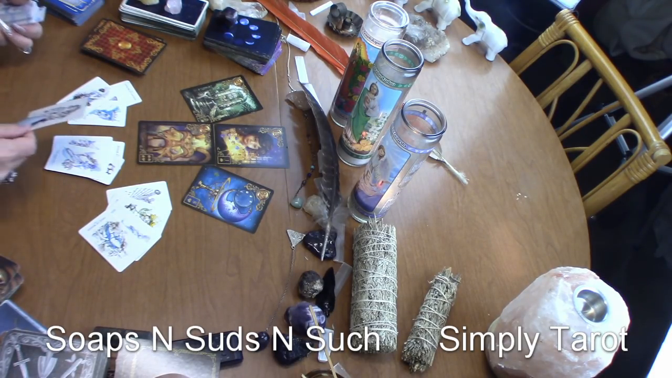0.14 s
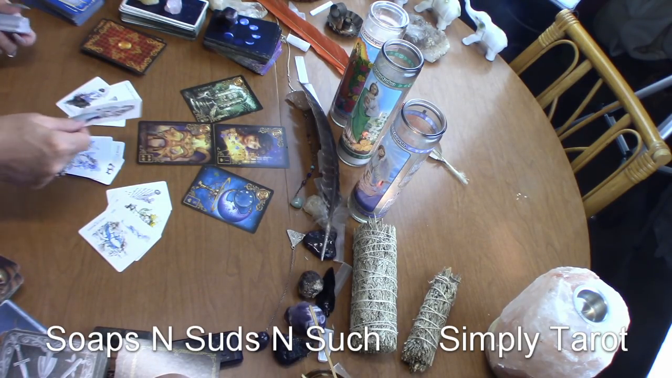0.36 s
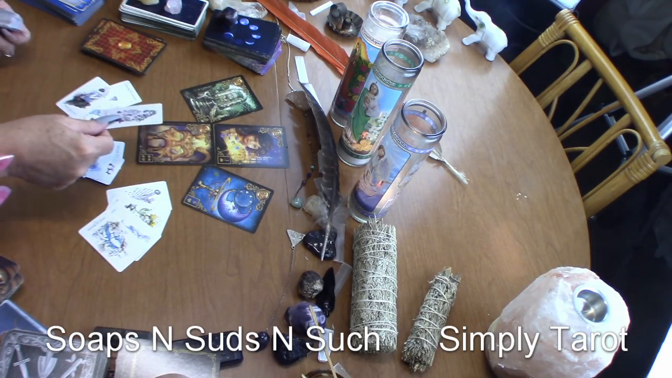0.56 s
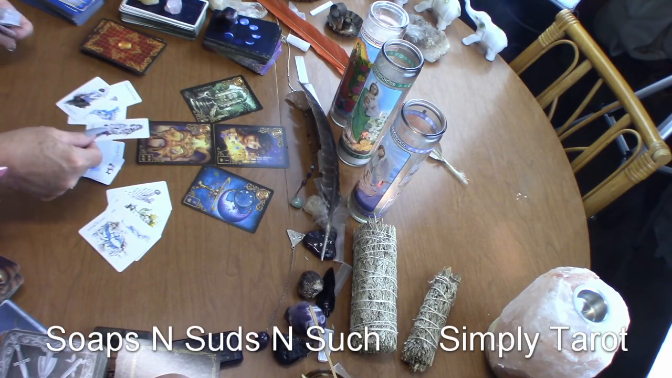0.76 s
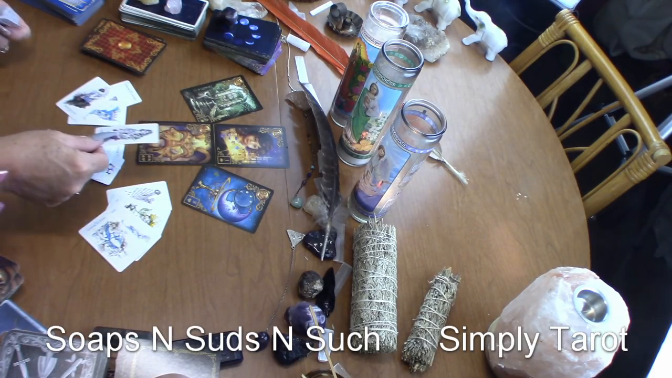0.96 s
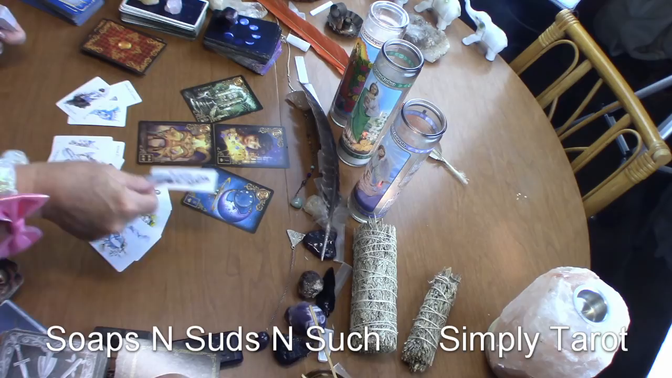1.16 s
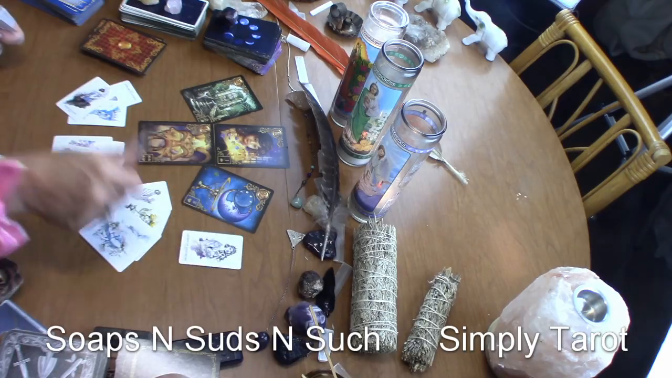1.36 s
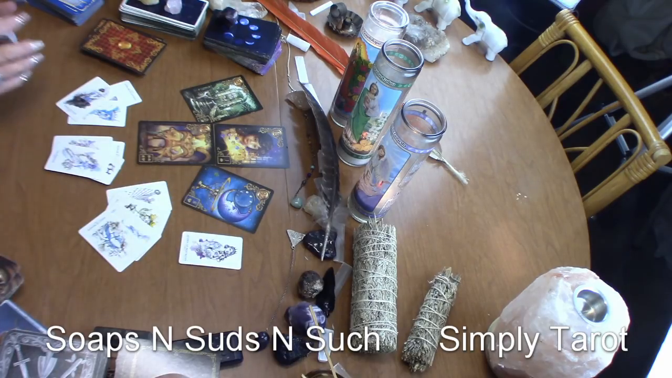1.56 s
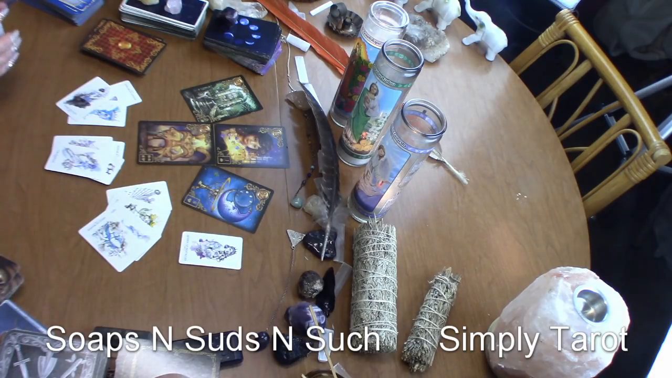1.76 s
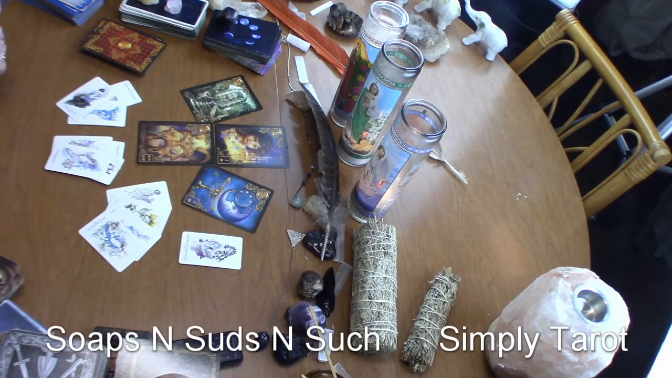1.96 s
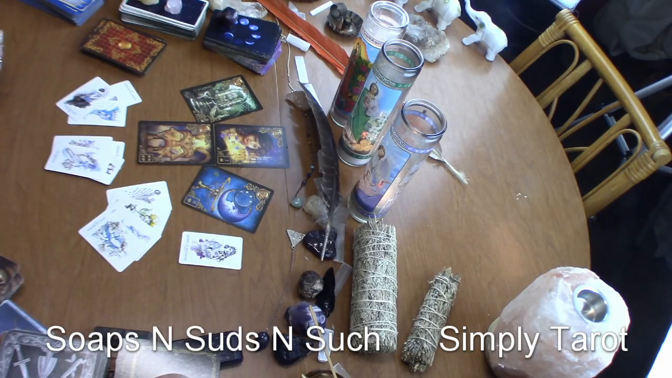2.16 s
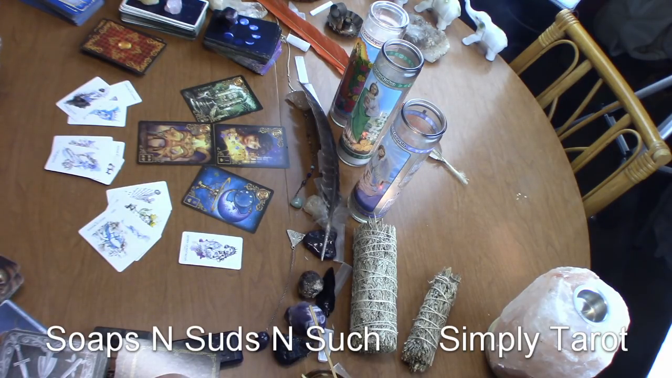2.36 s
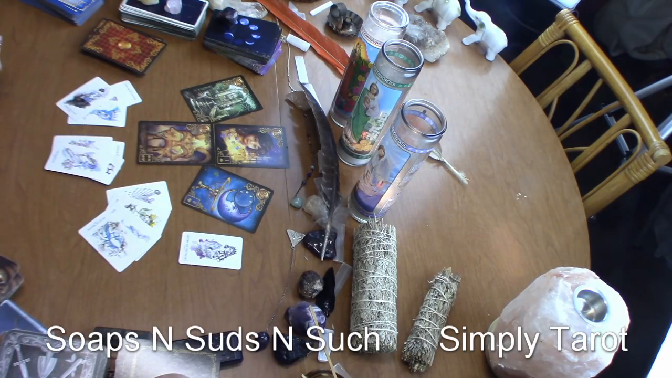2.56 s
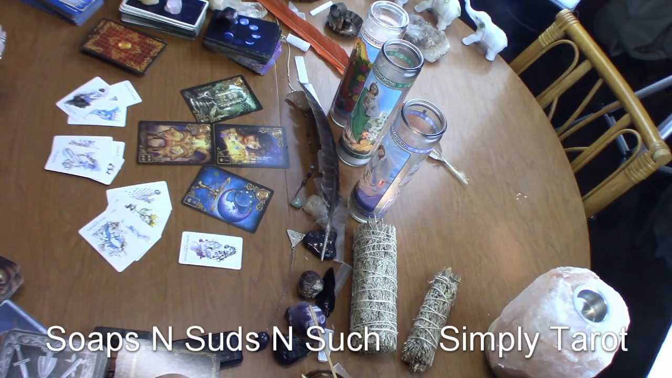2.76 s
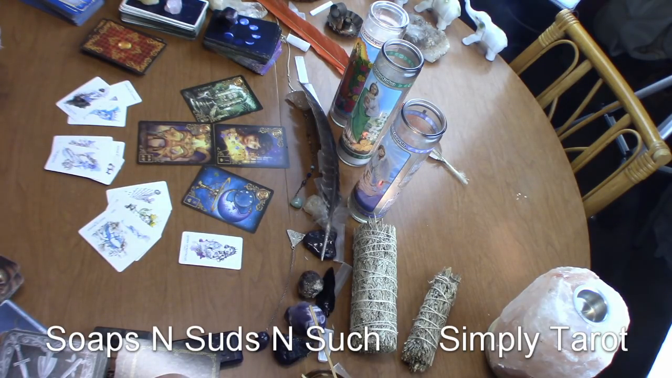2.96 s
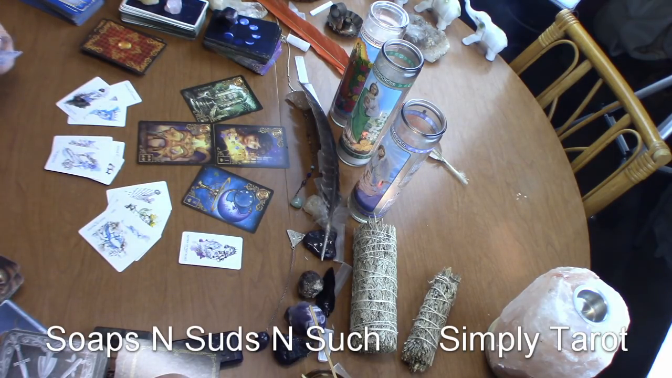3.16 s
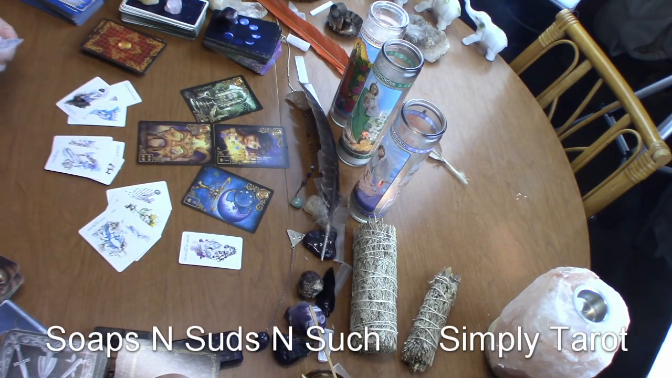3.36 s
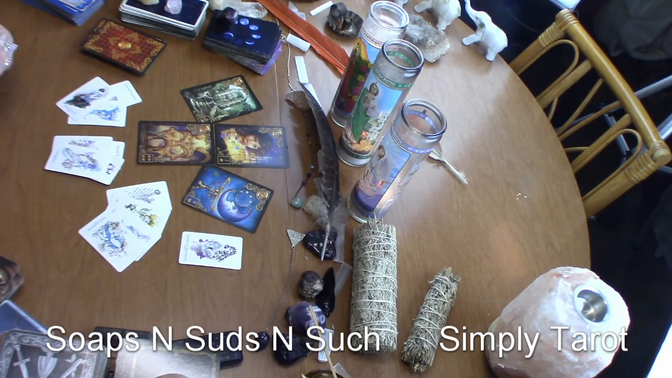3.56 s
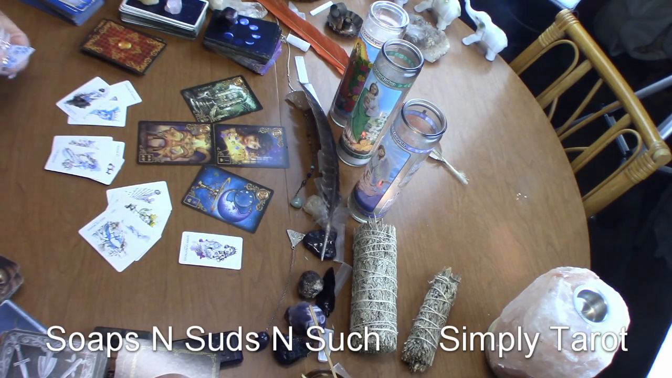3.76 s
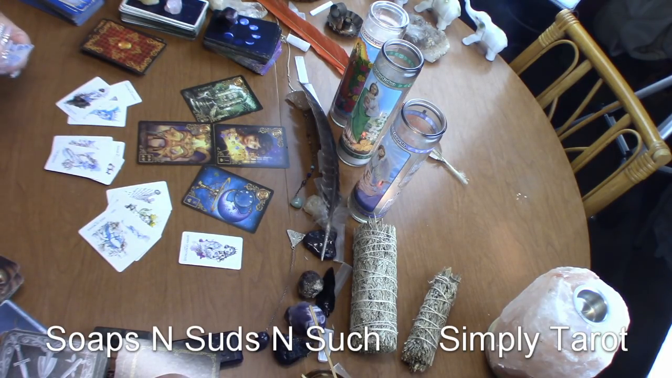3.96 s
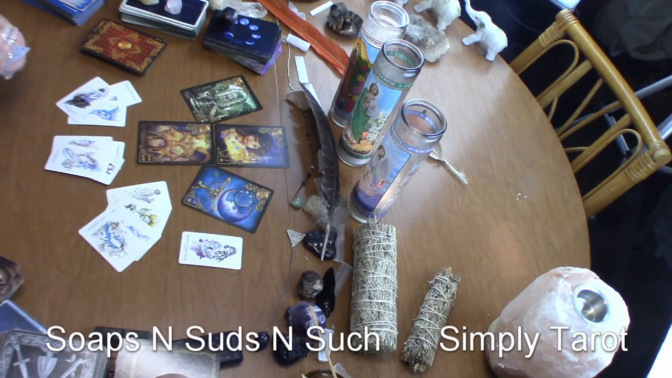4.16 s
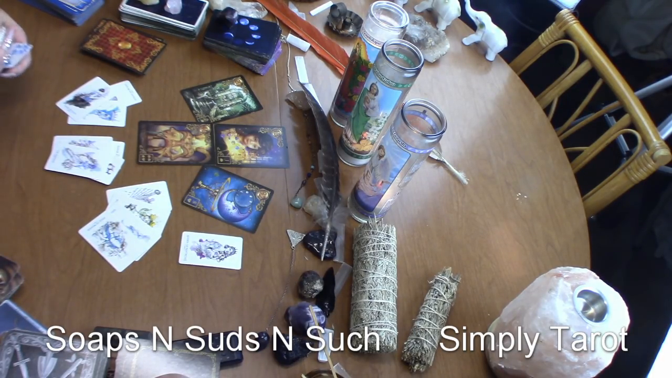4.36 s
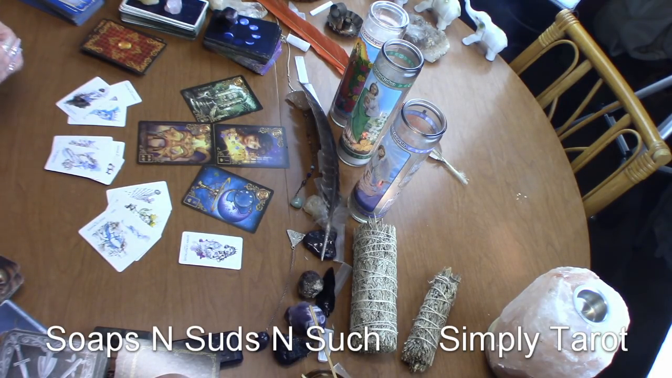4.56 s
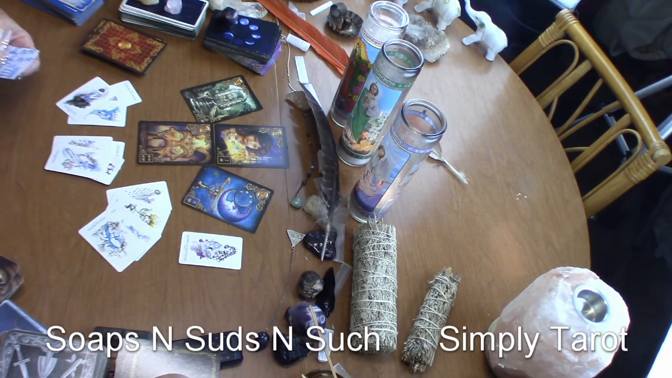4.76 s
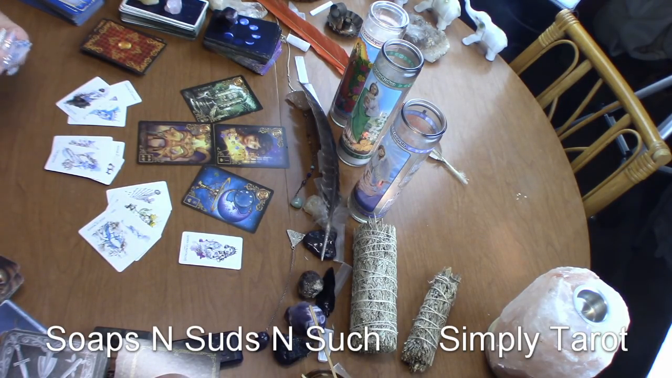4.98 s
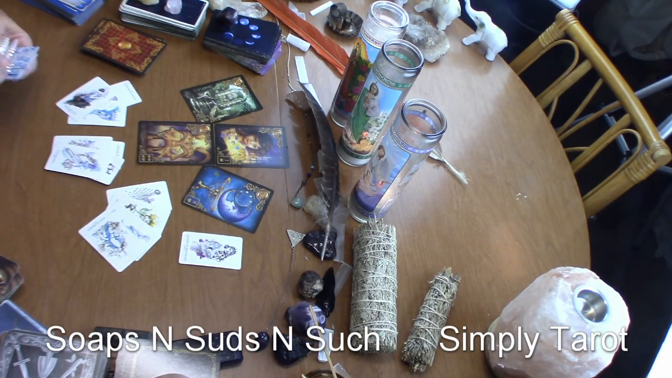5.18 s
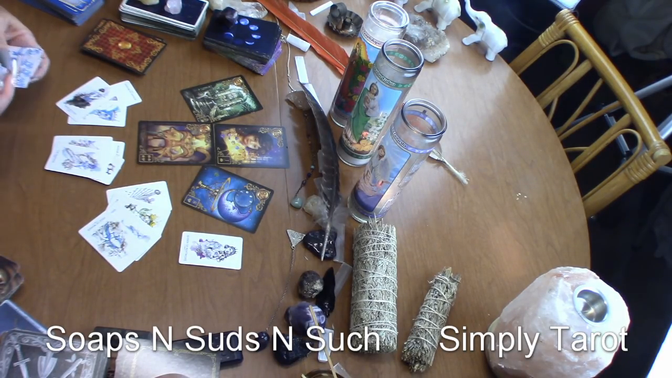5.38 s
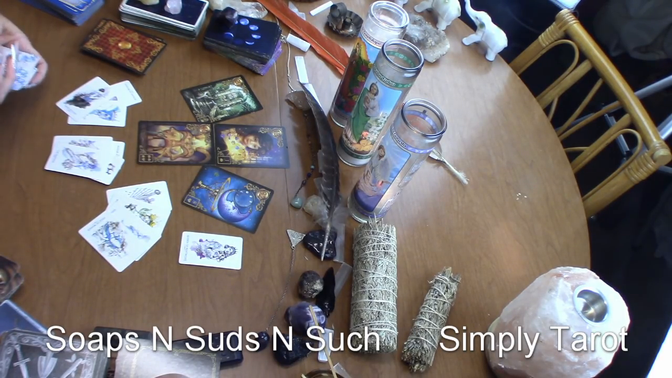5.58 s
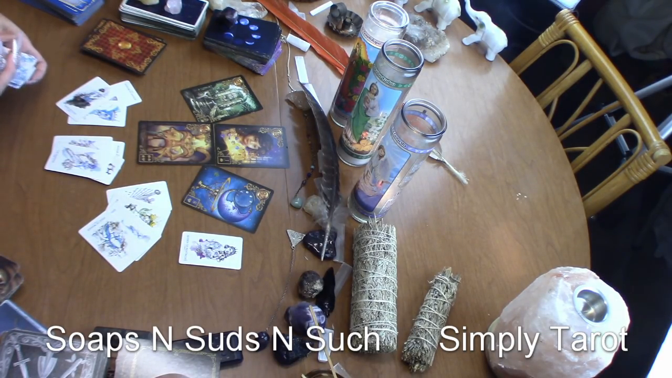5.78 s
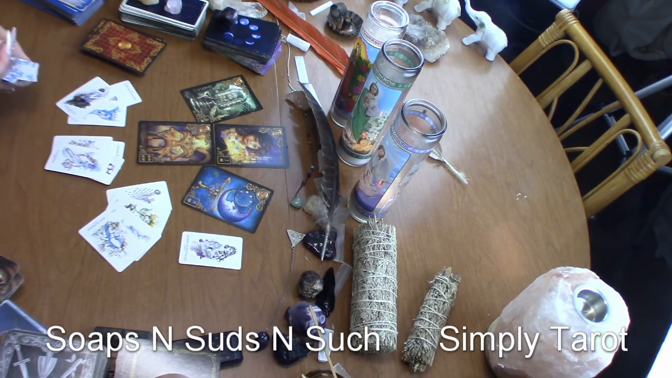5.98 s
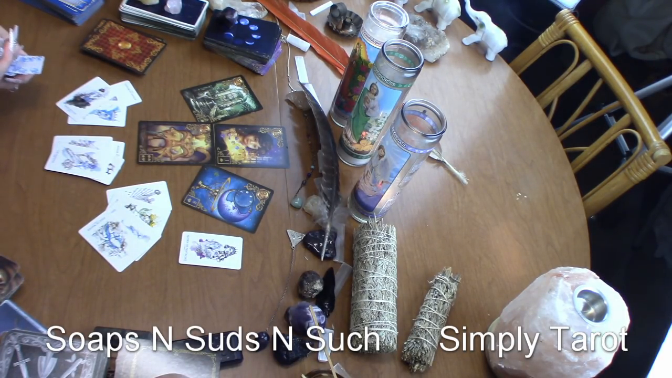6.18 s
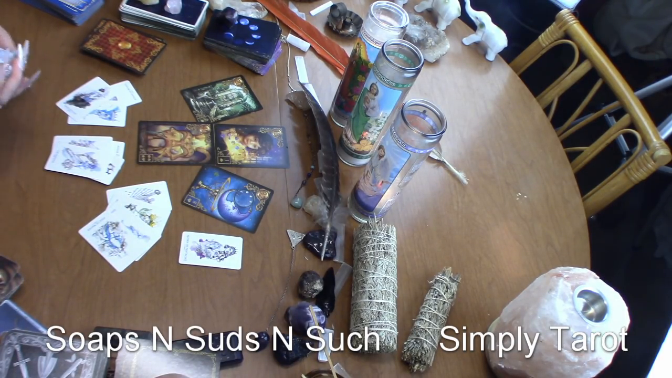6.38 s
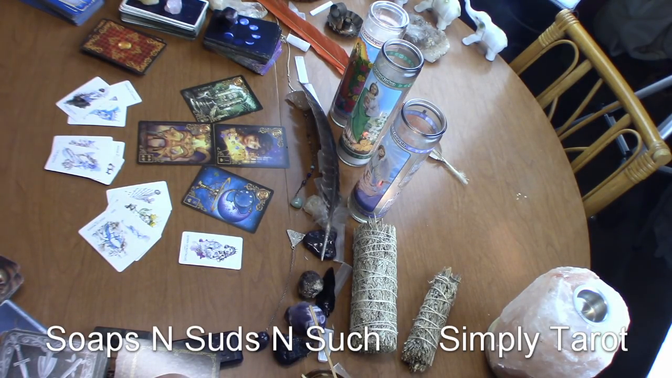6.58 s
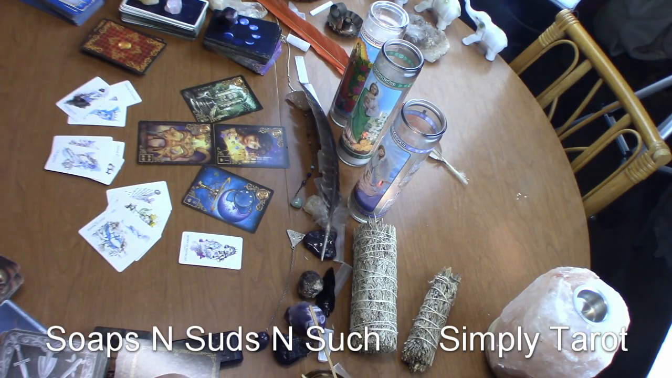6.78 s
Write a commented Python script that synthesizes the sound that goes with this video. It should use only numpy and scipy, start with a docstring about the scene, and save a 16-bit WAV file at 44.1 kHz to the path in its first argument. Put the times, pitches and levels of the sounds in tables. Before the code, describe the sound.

In a small, quiet room, a microphone just above a wooden table picks up cards being handled over a faint hiss. Light corner ticks lead to the snap of a card being put down. A short overhand shuffle follows, the cards rubbing and knocking as four packets slap onto the deck. One more card springs free with a sharp click, then a few light knocks and soft slides finish.

```python
"""Cards at a wooden table in a small quiet room, microphone close overhead, faint hiss and hum throughout.
Corners tick and cards slide in the hands, then one card is laid on the table with a snap.
From about three seconds the deck is shuffled overhand: loose cards knock, the deck bumps the palm,
and four packets are gripped, pulled and slapped down, a fingertip squeaking faintly before the last.
One more card snaps as it is drawn, and the handling ends in light knocks, ticks and rubbing."""
import sys
import numpy as np
from scipy import signal
from scipy.fft import rfft, irfft, next_fast_len
from scipy.io import wavfile
from scipy.ndimage import uniform_filter1d

SR = 44100
rng = np.random.default_rng(int(sys.argv[2]) if len(sys.argv) > 2 else 0)


def transcribe(signal):
    """Save signal, clipped to [-1, 1], as a 16-bit WAV file at the path in sys.argv[1]."""
    frames = np.atleast_2d(signal).T
    limited = np.clip(frames, -1, 1)
    pcm = np.round(limited * 32767).astype(np.int16)
    wavfile.write(sys.argv[1], SR, pcm)


N = 300934

# room tone at the microphone: (frequency [Hz], relative level [dB])
ROOM_TONE = [(12, -50), (20, -14), (65, -17), (134, -3), (698, 0), (949, -4), (1290, -6.5), (1400, -6.5),
             (2080, -10.5), (2530, -10), (3250, -12), (5530, -16), (10800, -26.5), (14700, -36),
             (16000, -46.5)]
# reflections off the table and other close surfaces: (delay [s], gain [ratio])
REFLECTIONS = [(.0006, 0.21), (.0024, 0.78), (.0065, 0.29), (.0088, .2), (0.0113, 0.078)]
# the small room's tail: (frequency [Hz], time to fall 60 dB [s])
ROOM_DECAY = [(150, 0.31), (600, 0.16), (1500, 0.19), (2800, 0.17), (4000, 0.16), (6000, 0.16),
              (10000, 0.15), (15000, 0.13)]
# resonances and hollows of the deck held over the table: (frequency [Hz], width [Hz], lift [dB])
DECK_MODES = [(543, 54, 9), (760, 110, -2), (837, 28, 4), (874, 110, 8), (1007, 32, 2.5), (1230, 240, 4.5),
              (1350, 30, -5.5), (1645, 74, -7), (1680, 30, 11), (1990, 130, -3), (2540, 42, -4),
              (2570, 100, 7), (2970, 63, 3.5), (3340, 93, 0), (3910, 84, 3.5), (5400, 650, 1),
              (5500, 140, 2), (6900, 510, -0.5), (7640, 270, -5), (8900, 380, 2.0), (9730, 820, 4.5),
              (9980, 1800, -5)]
# a card's corner ticks in the hand: (time [s], level [dB], top [dB])
CORNER_TICKS = [(.189, -20, -8), (.516, -20, -6), (0.531, -26.5, 3), (0.819, -27, -4), (1.712, -31, 0),
                (1.7832, -21, -10), (2.191, -32.5, 12), (2.2645, -17.5, -3), (2.43, -21.5, -6),
                (2.552, -23, -21), (2.728, -23.5, -8), (3.016, -18.5, -1.5), (4.147, -9.5, -8),
                (4.672, -12, -9), (5.3127, -16.5, -17), (6.0965, -16, -7.5), (6.397, -17, -6)]
# cards slide as the deck is handled and squared: (fastest moment [s], decay [s], level [dB])
CARD_SLIDES = [(0.438, 0.037, -51.5), (1.735, 0.027, -54.5), (1.89, 0.072, -53), (2.94, 0.014, -55),
               (3.06, 0.058, -53.5), (3.155, 0.024, -39), (3.41, 0.056, -46), (3.609, 0.01, -48.5),
               (3.73, 0.016, -45), (4.0, 0.042, -48), (4.255, 0.028, -44.5), (4.539, 0.0088, -49),
               (4.705, 0.032, -40.5), (4.96, 0.019, -30.5), (5.04, .025, -40.5), (5.915, 0.038, -44.5),
               (6.07, 0.057, -48), (6.489, 0.022, -58), (6.72, 0.14, -47)]
# colour of card rubbing on card: (frequency [Hz], relative level [dB])
RUB_SPECTRUM = [(60, -20.5), (200, -19.5), (450, -2.5), (900, 3), (1300, 1), (2000, 3), (2700, 5),
                (3400, 6), (4500, 0.5), (7000, -1), (10000, -8), (15000, -24)]
# a single card strikes the table or springs free:
# (time [s], level [dB], low [dB], mid [dB], top [dB], flutter [s], card resonance [Hz])
CARD_SNAPS = [(1.4105, -2.5, -0.5, 0.5, -10, .0022, 1100), (1.4172, 3.5, 2, 1.5, -12, 0.005, 1160),
              (1.4462, 16.5, -7.5, -2.5, -8.5, 0.00069, 3180), (1.4632, 11.5, -16, -0.5, -9, 0.00062, 3750),
              (5.6125, 0, -8, -6, -20, .008, 3390), (5.6216, 20.5, -27.5, -7.5, -8, 0.001, 3340),
              (5.6312, 9.5, -11, 2, -9.5, 0.0028, 4950)]
# peaks and dips of a single bent card: (frequency [Hz], width [Hz], lift [dB])
CARD_MODES = [(370, 117, 3.5), (1400, 410, 1), (2090, 630, -6.5), (3850, 250, 0), (4850, 320, 2),
              (5650, 450, -5), (6900, 520, 5.5), (8900, 700, 5)]
# loose cards knock against the deck:
# (time [s], level [dB], weight behind the card [dB], cupping [dB], flutter [s], card resonance [Hz])
LOOSE_KNOCKS = [(1.955, -15, 7, -1, 0.0025, 3140), (3.1325, -14.5, 12.5, -1, .0028, 2600),
                (3.1443, -5, 2, -4.5, 0.0079, 2560), (3.1897, 1, 5.5, 1, 0.0069, 2800),
                (3.397, -9, 5.5, 2, 0.0054, 2900), (3.6975, -13, 9.5, 2, 0.003, 2520),
                (3.723, 2, -11, 1.5, .009, 2500), (3.987, -5.5, 3, 2, .006, 2600),
                (3.999, 0.5, -7, 1.5, 0.0027, 2460), (4.17, -1, 0, 5, 0.0032, 3200),
                (4.237, -10, -1, -1.5, 0.011, 2740), (4.3047, -12, 0, 6.5, 0.039, 2540),
                (4.7596, -12.5, 5.5, 3.5, 0.0022, 3720), (4.803, 1.5, 0.5, 2, 0.0016, 3000),
                (4.948, 3.5, 2, 15, 0.0047, 3520), (4.9627, 4.5, -2.5, 0, 0.0077, 3530),
                (5.053, 0.5, -2.5, 2.5, 0.0044, 3830), (5.081, -9, 2, 0, .0017, 3030),
                (5.095, -4.5, 13.5, 11.5, .0016, 3030), (5.102, 5.5, -8.5, 3, 0.0016, 3210),
                (5.789, 3, -3.5, 4, 0.00072, 2860), (5.8773, -3, -2.5, 3.5, 0.0016, 2920),
                (5.9909, -11.5, 7.5, 7, 0.0056, 3480), (6.058, -9, 4.5, 9, 0.0078, 3390)]
# the deck bumps the palm: (time [s], level [dB], pitch [Hz])
PALM_THUDS = [(3.19, -42, 154), (3.474, -36, 264), (3.783, -33, 280), (3.957, -48.5, 184),
              (4.065, -29.5, 294)]
# the fingers grip the next packet: (time [s], level [dB], flutter [s])
FINGER_GRIPS = [(3.3263, -2.5, 0.0039), (3.653, -1, 0.0031), (3.9167, 1, .0065), (4.591, 0, .0016)]
# a packet lands on the deck: (time [s], level [dB], low [dB], mid [dB], top [dB], flutter [s],
# card resonance [Hz], hollow of the hand [Hz])
PACKET_SLAPS = [(3.4724, 21.5, -11.5, -5, -11.5, 0.0019, 2317, 840),
                (3.7841, 18, -3.5, -4, -8, 0.0026, 2880, 950),
                (4.066, 18.5, -6, -2.5, -6, 0.0037, 2897, 1200),
                (4.835, 14.5, -19, -1.5, -9.5, 0.0025, 2830, 1300)]
# a fingertip drags on a glossy card: (time [s], level [dB], pitch [Hz])
SQUEAK_PATH = [(4.35, -88, 1725), (4.39, -65.5, 1715), (4.5, -64.5, 1705), (4.57, -88, 1660)]

PACKET_HZ, PACKET_CUPPED_DB = 2975, 1.5   # a held packet's resonance, and the cupping around it


def from_db(db):
    """Decibels to gain."""
    return 10 ** (np.asarray(db) / 20)


def rms_one(x):
    """Scale to unit rms."""
    return x / np.sqrt(np.mean(x ** 2) + 1e-20)


def at_hz(points, hz):
    """Read a table along log frequency."""
    knots, values = np.transpose(points)
    return np.interp(np.log(hz + 1), np.log(knots), values)


def bins(size):
    """Frequencies of a spectrum of this many samples."""
    return np.fft.rfftfreq(size, 1 / SR)


def resonance_db(hz, centre_hz, width_hz, lift_db):
    """A rounded peak or dip."""
    return lift_db / (1 + (2 * (hz - centre_hz) / width_hz) ** 2)


def shaped(x, colour_db, grain_hz):
    """Minimum-phase filter that gives a burst this broad spectrum and keeps its finer ripple."""
    spectrum = rfft(x)
    broad_power = uniform_filter1d(abs(spectrum) ** 2, max(1, int(grain_hz * len(x) / SR)))
    cepstrum = irfft(np.log(from_db(colour_db) / np.sqrt(np.maximum(broad_power, 1e-12))))
    cepstrum[1:len(x) // 2] *= 2
    cepstrum[len(x) // 2 + 1:] = 0
    return irfft(spectrum * np.exp(rfft(cepstrum)))


def coloured(x, points):
    """Give steady noise a spectrum."""
    size = next_fast_len(len(x), real=True)
    return irfft(rfft(x, size) * from_db(at_hz(points, bins(size))), size)[:len(x)]


def add(out, s, sound):
    """Mix a sound in at s seconds."""
    start = round(s * SR)
    out[start:start + len(sound)] += sound[:len(out) - start]


def room_tone(hiss_db=-58.5, hum_db=-78.5, hum_hz=118.5):
    """The quiet room: steady hiss with a faint electrical hum."""
    hiss = rms_one(coloured(rng.standard_normal(N), ROOM_TONE))
    hum = rms_one(np.sin(2 * np.pi * hum_hz * np.arange(N) / SR))
    return from_db(hiss_db) * hiss + from_db(hum_db) * hum


def body_and_room(x, modes, tail_db, build_s=0.0004, size=8192):
    """Path to the microphone: direct sound, close reflections and a short tail, coloured by the cards."""
    t, hz = np.arange(size) / SR, bins(size)
    white, tail = rfft(rng.standard_normal(size)), np.zeros(size)
    centres_hz, t60s = np.transpose(ROOM_DECAY)
    for t60, pick in zip(t60s, np.eye(len(t60s))):
        band = np.interp(hz, centres_hz, pick)
        tail += irfft(white * band) * np.exp(-np.log(1000) * t / t60)
    tail *= 1 - np.exp(-t / build_s)
    response = from_db(tail_db) * tail / np.sqrt(np.sum(tail ** 2))
    response[0] += 1
    for delay_s, gain in REFLECTIONS:
        response[round(delay_s * SR)] += gain
    colour = sum(resonance_db(hz, *mode) for mode in modes)
    return signal.fftconvolve(x, shaped(response, colour, grain_hz=207))[:N]


def contact(row, chatter, edges_per_s, card_db, card_width_hz, bass_db, air_db, hollow_db=0, size=4096):
    """A first click and a dying flurry of edge clicks, coloured by the flexing card."""
    level_db, low_db, mid_db, top_db, flutter_s, card_hz, *hollow = row
    t, hz = np.arange(size) / SR, bins(size)
    edges = rng.standard_normal(size) * (rng.random(size) < edges_per_s / SR)
    flurry = edges * np.exp(-t / flutter_s)
    clicks = chatter * flurry / np.sqrt(np.sum(flurry ** 2) + 1e-2)
    clicks[0] += 1
    colour = at_hz([(30, low_db + bass_db), (170, low_db - 14), (330, low_db - 0.5), (600, low_db + 2.5),
                    (900, mid_db - 4), (1700, mid_db - 0.5), (2800, -3), (4600, -2),
                    (7800, top_db), (11000, top_db - 10), (16000, top_db + air_db)], hz)
    colour += resonance_db(hz, card_hz, card_width_hz, card_db)
    for hollow_hz in hollow:   # air squeezed from between the packets rings in the cupped hand
        colour += resonance_db(hz, hollow_hz, width_hz=150, lift_db=hollow_db)
    return shaped(clicks, level_db + colour, grain_hz=500)


def contacts(rows, modes, tail_db, **touch):
    """Play a set of contacts; the hands keep moving, so each finds its own paths through the room."""
    out = np.zeros(N)
    for s, *row in rows:
        add(out, s, body_and_room(contact(row, **touch), modes, tail_db))
    return out


def touches(rows):
    """Small contacts on the deck; the hands shield them from the microphone, so they carry more room."""
    return contacts(rows, DECK_MODES, tail_db=0, chatter=2.8, edges_per_s=4400,
                    card_db=8.5, card_width_hz=500, bass_db=-36, air_db=-25)


def corner_ticks(low_db=-20, mid_db=-3, flutter_s=0.0025, card_hz=2970):
    """A card's corner ticks lightly in the hand, with hardly any low end."""
    return touches([(s, level_db, low_db, mid_db, top_db, flutter_s, card_hz)
                    for s, level_db, top_db in CORNER_TICKS])


def slide_speed(rise_share=0.83, roundness=1.02, drag_lag_s=0.013, drag_s=0.014, pull_rise_s=0.03):
    """A free slide speeds up and slows down in one hump; a pulled packet speeds up until it lands."""
    t, speed = np.arange(N) / SR, np.zeros(N)
    # the fingers drag across the card edges as they grip
    drags = [(s + drag_lag_s, drag_s, grip_db - 40) for s, grip_db, _ in FINGER_GRIPS]
    for s, fall_s, level_db in CARD_SLIDES + drags:
        from_peak = abs(t - s) / np.where(t < s, rise_share * fall_s, fall_s)
        near = from_peak < 10
        speed[near] += from_db(level_db) * np.exp(-from_peak[near] ** roundness)
    for s, slap_db, *_ in PACKET_SLAPS:
        speed += from_db(slap_db - 58) * np.exp(-abs(s - t) / pull_rise_s) * (t < s)
    return speed


def rubbing(catches_per_s=500, catch_db=-11, rough_db=1.5):
    """Friction hiss that wavers as the cards stick and slip, with tiny catches of the edges."""
    slip = np.tanh(rms_one(uniform_filter1d(rng.standard_normal(N), size=200)))
    catches = rms_one((rng.random(N) - .5) * (rng.random(N) < catches_per_s / SR))
    hiss = rng.standard_normal(N) + from_db(catch_db) * catches
    friction = rms_one(hiss * from_db(rough_db * slip))
    return body_and_room(slide_speed() * coloured(friction, RUB_SPECTRUM), DECK_MODES, tail_db=-6)


def card_snaps():
    """One card strikes the table or springs free, out in the open under the microphone."""
    return contacts(CARD_SNAPS, CARD_MODES, tail_db=-1.5, chatter=1.0, edges_per_s=6400,
                    card_db=11, card_width_hz=800, bass_db=-30, air_db=-23)


def knocks(rows):
    """Cards knock on the deck: weight lifts the lows and mids, cupped hands hold back lows and top."""
    voiced = []
    for s, level_db, weight_db, cupped_db, flutter_s, card_hz in rows:
        low_db = weight_db - 3 - cupped_db
        top_db = -7.5 - 0.45 * level_db - cupped_db   # a harder knock rings the card more than its edge
        voiced.append((s, level_db, low_db, weight_db, top_db, flutter_s, card_hz))
    return touches(voiced)


def palm_thuds(rise_s=0.0054, t60_s=0.11, size=8192):
    """The deck bumps the soft palm: a low tone swells and quickly dies."""
    out, t = np.zeros(N), np.arange(size) / SR
    envelope = (1 - np.exp(-t / rise_s)) * np.exp(-np.log(1000) * t / t60_s)
    for s, level_db, hz in PALM_THUDS:
        add(out, s, from_db(level_db) * envelope * np.sin(2 * np.pi * hz * t))
    return out


def finger_grips(weight_db=3.5):
    """The fingers close on the next packet with a small knock."""
    return knocks([(s, level_db, weight_db, PACKET_CUPPED_DB, flutter_s, PACKET_HZ)
                   for s, level_db, flutter_s in FINGER_GRIPS])


def leading_edges(lead_s=0.007, level_db=5.5, weight_db=0, flutter_s=0.0045):
    """Each packet's front edge touches just before it lands."""
    return knocks([(s - lead_s, level_db, weight_db, PACKET_CUPPED_DB, flutter_s, PACKET_HZ)
                   for s, *_ in PACKET_SLAPS])


def packet_slaps():
    """A packet lands on the deck in a dense flurry of edges and rings the hollow of the hand."""
    return contacts(PACKET_SLAPS, DECK_MODES, tail_db=-0.6, chatter=3.0, edges_per_s=8000,
                    card_db=10, card_width_hz=163, bass_db=-45, air_db=-24.5, hollow_db=6.5)


def finger_squeak(waver_hz=44.8, rough_db=-4):
    """Stick-slip of a fingertip on a glossy card gives a faint, uneven tone."""
    t = np.arange(N) / SR
    s, level_db, hz = np.transpose(SQUEAK_PATH)
    drag, grip = (rms_one(uniform_filter1d(noise, size=300)) for noise in rng.standard_normal((2, N)))
    pitch_hz = np.interp(t, s, hz) + waver_hz * drag
    tone = np.sin(2 * np.pi * np.cumsum(pitch_hz) / SR)
    envelope = np.interp(t, s, from_db(level_db), left=0, right=0)
    return envelope * rms_one(tone * from_db(rough_db * grip))


def scene():
    """Room, card handling and shuffle as they arrive close above the table, in mono."""
    handling = room_tone() + corner_ticks() + rubbing() + card_snaps() + knocks(LOOSE_KNOCKS)
    shuffle = palm_thuds() + finger_grips() + leading_edges() + packet_slaps() + finger_squeak()
    return (handling + shuffle)[None]


def record(dry):
    """The microphone's diaphragm spreads each click over a few cycles; peaks, deep bass and top are cut."""
    diaphragm_hz, width_hz = 4000, 3000
    radius, angle = np.exp(-np.pi * width_hz / SR), 2 * np.pi * diaphragm_hz / SR
    poles = np.array([1, -2 * radius * np.cos(angle), radius ** 2])
    spread = signal.lfilter(poles[::-1], poles, dry)   # all-pass
    clipped = np.clip(spread, -.85, .85)
    low_cut = signal.butter(2, 15, "high", fs=SR, output="sos")
    high_cut = signal.ellip(12, .1, 90, 15900, fs=SR, output="sos")
    return signal.sosfilt(high_cut, signal.sosfilt(low_cut, clipped))


dry = scene()
out = record(dry)
transcribe(out)
```